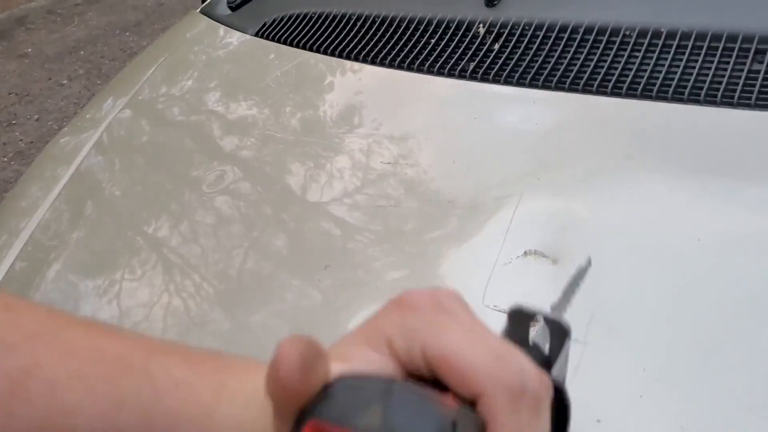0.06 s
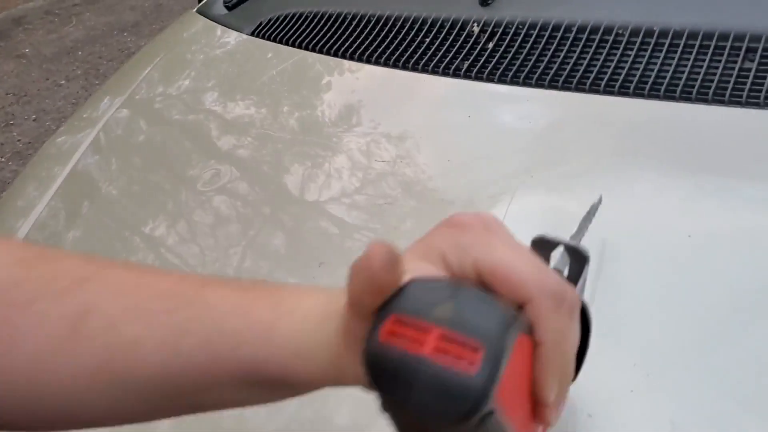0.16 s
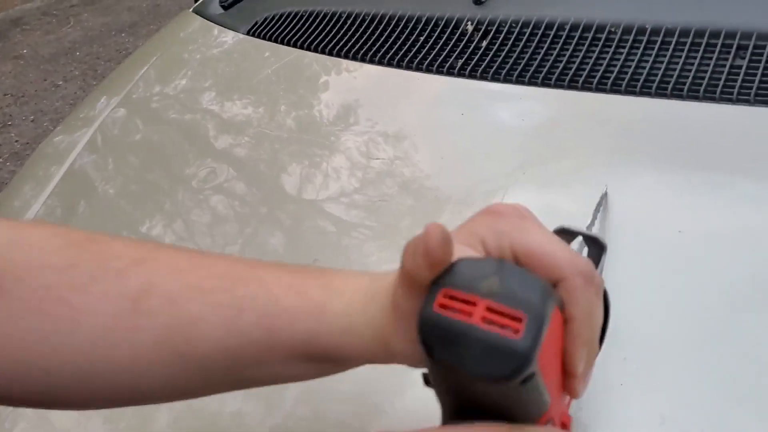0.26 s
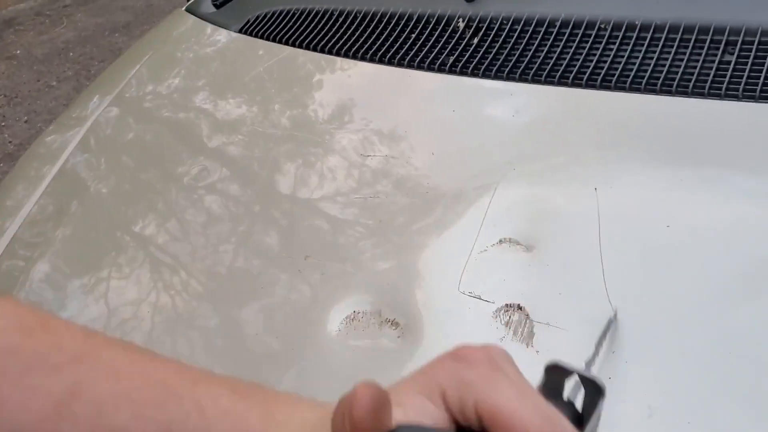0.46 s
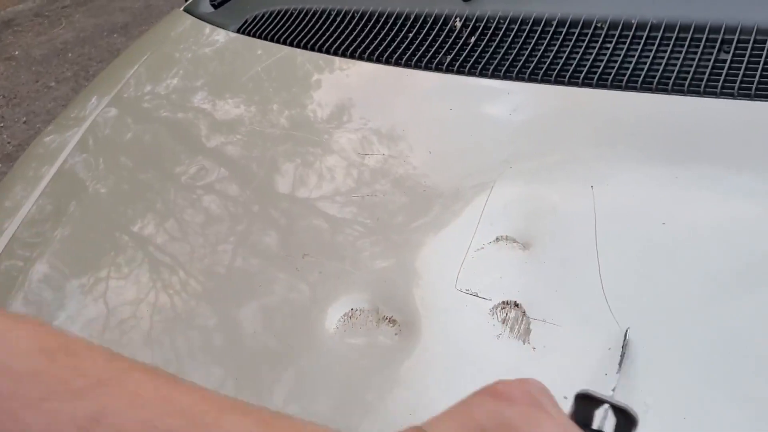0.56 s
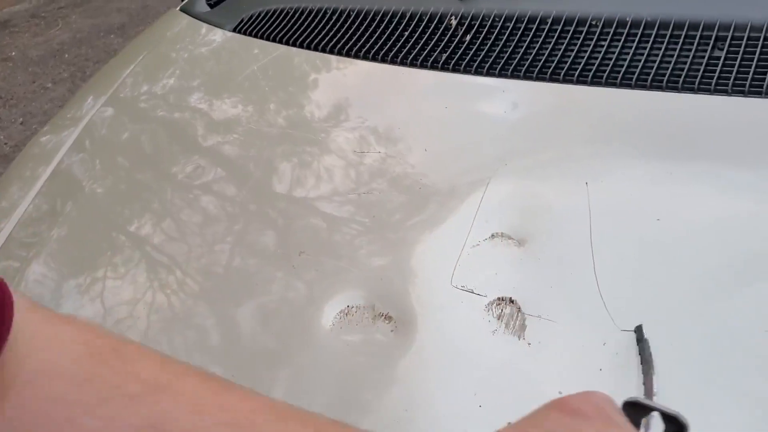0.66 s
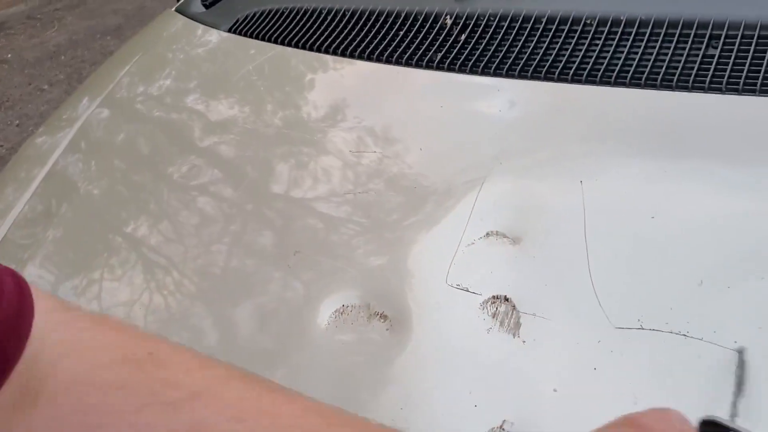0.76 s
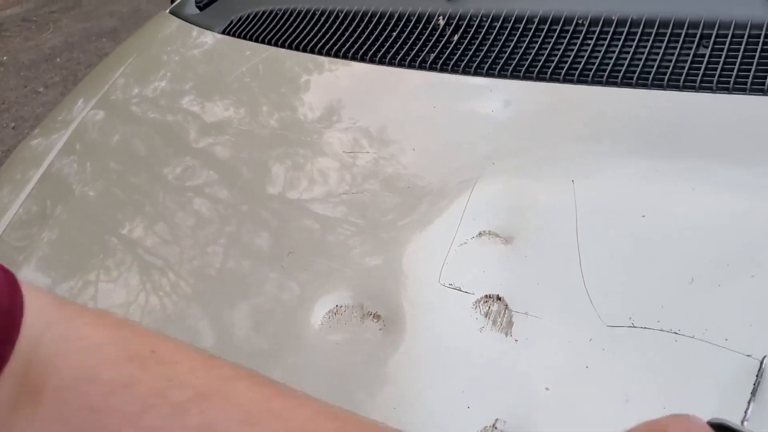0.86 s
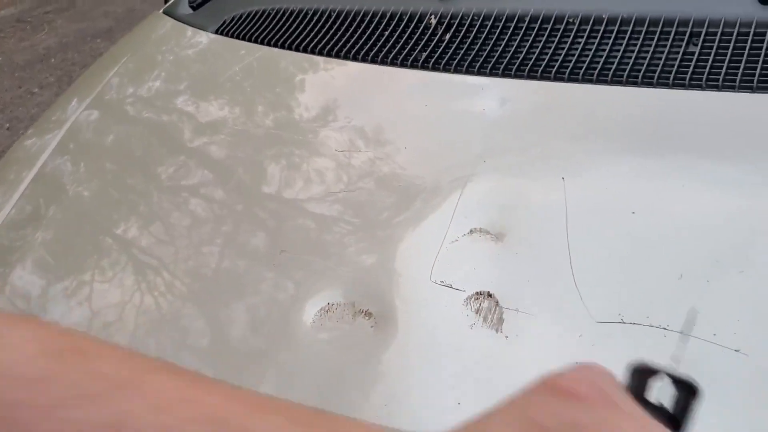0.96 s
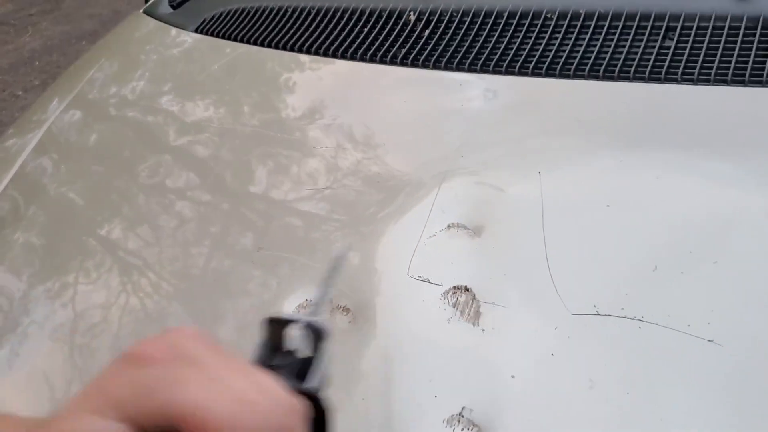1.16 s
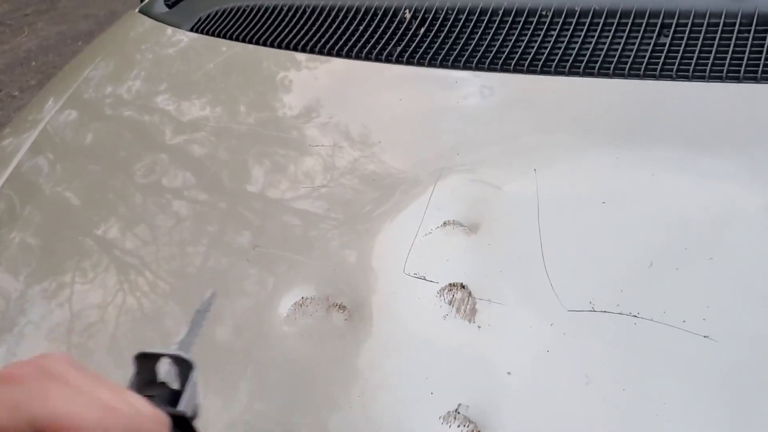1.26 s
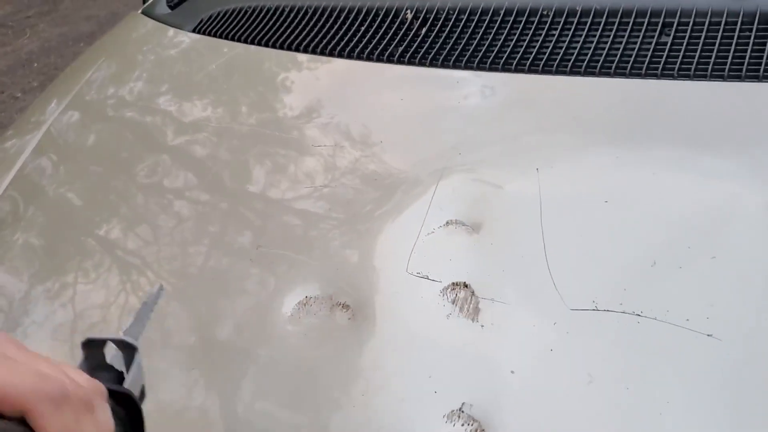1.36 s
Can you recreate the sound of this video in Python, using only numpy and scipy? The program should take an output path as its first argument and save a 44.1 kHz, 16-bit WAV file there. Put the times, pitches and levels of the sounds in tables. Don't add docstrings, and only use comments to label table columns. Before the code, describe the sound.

A saw blade tip scratches painted sheet metal, heard close outdoors. A hollow, boomy clunk lands at 0.22 seconds, then a short dry scrape with a rough chatter at 0.4-0.5. A second knock at 0.62 leads into a louder, gritty, bright rasp until about 0.8, the panel ringing briefly. Small clicks follow at 1.19 and 1.4. A low engine idle, distant traffic and faint bird chirps continue around it.

```python
import sys
import numpy as np
from scipy import signal
from scipy.fft import rfft, irfft
from scipy.io import wavfile

SR = 44100
rng = np.random.default_rng(int(sys.argv[2]) if len(sys.argv) > 2 else 0)


def transcribe(u):
    v = np.clip(np.atleast_2d(u).T, -1, 1)
    q = np.round(v * 32767).astype(np.int16)
    wavfile.write(sys.argv[1], SR, q)


def decibels_to_gain(level_db):
    exponent = np.asarray(level_db, float) / 20
    return 10 ** exponent


N = 61739

# start in seconds, level in dB, fade in seconds, place on the panel (0-2).
LANDINGS = [
    (0.2235, -17.5, 0.0071, 0),
    (0.3896, -38, 0.0017, 1),
    (0.618, -26.5, 0.0052, 0),
    (0.646, -37.5, 0.0035, 2),
]
# time in seconds, speed as tip hiss in dB, pressure as panel drive in dB.
DOWN_STROKE = [(0.261, -69.5, -54), (.305, -50, -38.5), (.35, -55, -49.5), (0.393, -54.5, -57),
               (0.401, -42.5, -24.5), (0.436, -44.5, -27.5), (.487, -62.5, -47.5), (0.518, -63.5, -47.5),
               (0.556, -100, -62)]
SIDE_STROKE = [(0.646, -52, -72), (.652, -28, -24), (0.661, -32, -24.5), (0.669, -32, -30.5),
               (.69, -33, -25.5), (0.721, -32, -27.5), (0.73, -37.5, -32), (0.789, -45.5, -32.5),
               (0.817, -70, -39.5)]
# start in seconds, hiss in dB, panel drive in dB, fade in seconds.
CATCHES = [(0.6327, -34, -46, 0.0042), (0.65, -39, -47, 0.0038), (0.6643, -33, -34, 0.003),
           (.682, -38, -32, 0.0064), (0.7, -31, -24, 0.006), (0.708, -41, -34, 0.0025),
           (0.719, -45, -26, 0.0047), (0.739, -46, -31, .005), (0.75, -42, -46, 0.0022),
           (.434, -61, -40, 0.0015), (0.44, -60, -38, 0.00095)]
# frequency in Hz, T60 in seconds, level in dB at places 0, 1 and 2.
PANEL_MODES = [(303.6, 0.18, 3.5, -21, -11), (345, 0.26, -2.5, -23, -16), (447.3, 0.25, -6, -13.5, -22),
               (843, 0.044, 4, -19, -24), (1006, 0.35, -7, -3.5, -8), (1211, 0.11, -2, -1, -5),
               (1460, 0.066, -23, -17, -21), (1636, 0.069, 10, 11, 9.5), (1730, 0.056, 13.5, 2, 5.5),
               (1816, 0.026, -13, 16, 14), (2133, 0.025, -19, 13, -16), (2640, 0.075, -17, 3, 0)]
# frequency in Hz, level in dB.
WEAK_MODES = [(200, -23), (500, -15.5), (1200, -9.5), (2000, -10.5), (3200, -17), (5000, -26.5),
              (7500, -13), (10000, -34.5)]
# frequency in Hz, density in dB per Hz.
TEARING = [(2500, 16.5), (4500, 6), (6200, 2), (8300, -3), (9900, -9.5), (11500, -0.5), (13200, -1.5),
           (15400, -0.5)]
# time in seconds, slips per second, level in dB.
CHATTER = [(.4, 1630, -66), (.412, 1280, -41), (.43, 970, -29), (.452, 1070, -39), (.47, 940, -39),
           (.52, 900, -90), (.66, 1000, -100), (.695, 1250, -38), (.72, 1220, -33), (.76, 1300, -40),
           (.83, 760, -100)]
# start in seconds, push in dB, signed size, length in seconds.
FLEXES = [
    (0.236, -22.5, -0.47, 0.0097),
    (0.619, -25.5, 0.42, 0.005),
    (0.647, -17.5, -0.2, 0.0048),
    (.663, -18.5, -0.53, 0.0056),
]
# frequency in Hz, level in dB, T60 in seconds.
BOOM_MODES = [(65.53, 7, 0.64), (83, 13, 0.061), (99.3, 10.5, 0.24), (139, 2.5, 0.59)]
# start in seconds, level in dB, frequency in Hz,
# T60 in seconds, hiss in dB.
KNOCKS = [(0.2012, -36.5, 1570, 0.039, -61), (0.2241, -5, 277, 0.032, -49), (.235, -30, 456, 0.47, -80),
          (0.2253, -21, 1694, 0.091, -54), (.232, -20.5, 830, 0.085, -80), (.232, -28.5, 309, 0.43, -80),
          (0.3984, -21.5, 1627, 0.046, -66), (.563, -60, 2950, 0.02, -46), (0.608, -54, 3000, 0.016, -45),
          (0.6206, -23.5, 1822, 0.045, -29.5), (0.616, -19.5, 127.2, 0.11, -78),
          (.626, -19.5, 345, 0.16, -76.5), (.772, -25, 318.2, 0.44, -74),
          (1.1859, -19.5, 2317, 0.012, -34.5), (1.1862, -41, 3100, 0.012, -70),
          (1.191, -31.5, 2160, 0.018, -63), (0.225, -18.5, 1320, 0.045, -70), (.62, -25, 530, 0.065, -80),
          (.651, -14.5, 140.6, 0.11, -80), (1.396, -29.5, 1780, 0.021, -49.5)]
# frequency in Hz, level in dB, T60 in seconds.
LEFTOVER_MODES = [(95, -23.5, 0.021), (263.7, -40.5, 0.46), (317, -39, 0.29)]
# frequency in Hz, level in dB, T60 in seconds.
EXHAUST_MODES = [(75, -17, 0.27), (114.2, -2, 0.36), (131.4, -0.5, 0.16), (182.5, -3.5, 0.19),
                 (267, -36, 0.28), (402, -19, 0.18)]
# frequency in Hz, density in dB per Hz.
RUMBLE = [(25, -30), (40, -6), (100, 8.5), (200, -11.5), (300, -24.5), (500, -24)]
TRAFFIC = [(400, -2), (600, -12.5), (980, -4.5), (1400, -10), (2000, -7.5), (3000, -23), (5000, -33),
           (16000, -49.5)]
# time in seconds, level in dB.
TRAFFIC_SWELL = [(0, -6), (.2, -0.5), (.9, -0.5), (1.4, 0)]
# frequency in Hz, left-right likeness (-1 to 1).
LIKENESS = [(60, 0.83), (150, 0.99), (350, 0.64), (520, 0.41), (700, 1), (1100, -0.28), (2000, -0.072)]
# time in seconds, pitch in Hz, level in dB.
FIRST_BIRD = [(.06, 4640, -90), (.075, 4640, -72), (.095, 4650, -65), (.12, 4650, -59), (.135, 4790, -61),
              (.155, 4870, -66), (.175, 4910, -75), (.2, 4960, -68), (.23, 5000, -90)]
SECOND_BIRD = [(.76, 3300, -77), (.778, 3330, -45), (.81, 3170, -52), (.83, 3200, -57), (.855, 3130, -53),
               (.89, 3060, -53), (.916, 3170, -58), (.93, 3900, -64), (.955, 4500, -75)]

LEFT_DB = -1.15
GRAINS_PER_S, GRAIN_SPREAD_DB, JUDDER_DB = 4500, 2, 1
LANDING_HISS_DB, CATCH_DULL_DB = -19.5, -2
KNOCK_HISS_SHARE, KNOCK_HISS_MAX_S = .1, .0035
WEAK_T60_S, WEAK_T60_SLOPE = 0.28, 0.81
SPLIT_HZ = 620
HISS_SHARED, BRIGHT_HZ, BRIGHT_DB = 0.4, 10500, -2.5
TIP_HZ, TIP_WIDTH_HZ, TIP_GAIN = 12900, 300, .8
CHATTER_WOBBLE_HZ, CHATTER_OCTAVE_DB = 45.06, -11.5
BOOM_LEAN_DB, BOOM_LAG_S = -0.5, .0005
SPREAD_CYCLES, RISE_CYCLES = 12.2, 0.45
FIRING_S, FIRST_FIRING_S, SPEEDING_S = .0277, -.005, 2.9e-6
WEAK_CYLINDER_DB, FIRING_SPREAD_DB, ENGINE_DB = -13.5, 3, -35.5
RUMBLE_DB, TRAFFIC_DB = -37, -49
TRILL_HZ, TRILL_PER_S = 105, 38
ECHO_T60_S, ECHO_SHARE = .4, .7


def in_time(rows, quiet=None):
    s, *columns = np.transpose(rows)
    return [np.interp(np.arange(N) / SR, s, c, quiet, quiet) for c in columns]


def at_hz(points, hz):
    table_hz, value = np.transpose(points)
    return np.interp(np.log(hz), np.log(table_hz), value)


def rms_one(x):
    return x / np.sqrt(np.mean(x ** 2) + 1e-20)


def drift(rate_hz):
    r = np.exp(-2 * np.pi * rate_hz / SR)
    noise = rng.standard_normal(N + SR)
    return rms_one(signal.lfilter([1], [1, -2 * r, r * r], noise)[SR:])


def filtered(x, order, hz, kind):
    return signal.sosfilt(signal.butter(order, hz, kind, fs=SR, output="sos"), x)


def ringing(hz, t60, gain):
    t = np.arange(SR // 2) / SR
    hz, t60 = np.asarray(hz)[:, None], np.asarray(t60)[:, None]
    return gain @ (np.sin(2 * np.pi * hz * t) * decibels_to_gain(-60 * t / t60))


def through(x, response):
    return signal.fftconvolve(np.atleast_2d(x), np.atleast_2d(response), axes=1)[:, :N]


def burst(s, length_s):
    t = np.maximum(np.arange(N) / SR - s, 0)
    return (1 - np.exp(-t / 0.00077)) * np.exp(-t / length_s)


def grains():
    sizes = decibels_to_gain(GRAIN_SPREAD_DB * np.minimum(rng.exponential(1, N), 5))
    signs = rng.choice([-1, 1], N)
    return rms_one(sizes * signs * (rng.random(N) < GRAINS_PER_S / SR))


def contact():
    drive, speed, snap = np.zeros((3, N)), np.zeros(N), np.zeros(N)
    judder = decibels_to_gain(JUDDER_DB * drift(79))
    for place, stroke in ((1, DOWN_STROKE), (2, SIDE_STROKE)):
        hiss_db, press_db = in_time(stroke, quiet=-200)
        speed += decibels_to_gain(hiss_db) * judder
        drive[place] += decibels_to_gain(press_db) * judder
    for s, db, length_s, place in LANDINGS:
        shape = burst(s, length_s)
        drive[int(place)] += decibels_to_gain(db + 10) * shape
        speed += decibels_to_gain(db + LANDING_HISS_DB) * shape
    for s, _, _, t60, hiss_db in KNOCKS:
        speed += decibels_to_gain(hiss_db) * burst(s, min(KNOCK_HISS_SHARE * t60, KNOCK_HISS_MAX_S))
    for s, hiss_db, press_db, length_s in CATCHES:
        shape = burst(s, length_s)
        place = 1 + int(s > SIDE_STROKE[0][0])
        speed += decibels_to_gain(hiss_db + CATCH_DULL_DB) * shape
        snap += decibels_to_gain(hiss_db) * shape
        drive[place] += decibels_to_gain(press_db) * shape
    return drive, speed, snap


def panel_at(place):
    weak_hz = np.geomspace(200, 10000, num=200) * rng.uniform(.99, 1.01, 200)
    weak_t60 = WEAK_T60_S * (1000 / weak_hz) ** WEAK_T60_SLOPE
    table = np.array(PANEL_MODES)
    hz = np.r_[table[:, 0], weak_hz]
    t60 = np.r_[table[:, 1], weak_t60]
    level = decibels_to_gain(np.r_[table[:, 2 + place], at_hz(WEAK_MODES, weak_hz)])
    turn = rng.choice([-1, 1], len(hz)) * rng.uniform(0.36, 0.76, len(hz)) * np.pi / 2
    turn = turn * hz ** 2 / (hz ** 2 + SPLIT_HZ ** 2)
    ears = np.cos(turn + np.pi / 4 * np.array([[-1], [1]])) * rng.choice([-1, 1], len(hz))
    response = ringing(hz, t60, level * ears)
    return response / np.sqrt(np.sum(response ** 2) / 2)


def tearing_hiss(speed, snap):
    shared = grains()
    flakes = HISS_SHARED * np.array([np.roll(shared, 5), shared]) + 1.03 * np.array([grains(), grains()])
    hz = np.fft.rfftfreq(2 * SR, 1 / SR) + 1
    colour = decibels_to_gain(at_hz(TEARING, hz)) * hz ** 2 / (hz ** 2 + TEARING[0][0] ** 2)
    colour = colour / (1 + (hz / 15700) ** 120)
    colour = colour * (1 + TIP_GAIN / (1 + ((hz - TIP_HZ) / TIP_WIDTH_HZ) ** 2))
    colour = 1.41 * colour / np.sqrt(np.mean(colour ** 2))
    hiss = irfft(rfft(flakes * speed, 2 * SR) * colour)[:, :N]
    top = filtered(hiss, 4, BRIGHT_HZ, "high")
    return hiss + top * (decibels_to_gain(BRIGHT_DB) + snap / speed - 1)


def blade():
    drive, speed, snap = contact()
    force = grains()
    rings = sum(through(force * drive[place], panel_at(place)) for place in range(3))
    return rings + tearing_hiss(speed, snap)


def chatter():
    slip_hz, db = in_time(CHATTER, quiet=-200)
    turn = 2 * np.pi * np.cumsum(slip_hz + CHATTER_WOBBLE_HZ * drift(88.7)) / SR
    common = drift(49)
    ears = []
    for lag in (0, 1.2):
        tone = np.sin(turn + lag) + decibels_to_gain(CHATTER_OCTAVE_DB) * np.sin(2 * turn - lag)
        ears.append((1.56 + .5 * common + .5 * drift(72)) * tone)
    return decibels_to_gain(db) * np.array(ears)


def knocks():
    out, t = np.zeros((2, N + SR)), np.arange(SR // 2) / SR
    for s, db, hz, t60, _ in KNOCKS:
        spread = min((SPREAD_CYCLES / (hz * t60)) ** 1.51, .4)
        cluster = 1 + spread * np.array([-0.91, 0.077, 0.113, 0.68])
        gain = decibels_to_gain(db - 10 + rng.normal(0, 1.5, (2, len(cluster))))
        click = ringing(hz * cluster, np.full(len(cluster), t60), gain)
        start = int(s * SR)
        out[:, start:start + SR // 2] += click * (1 - np.exp(-t * hz / RISE_CYCLES))
    return out[:, :N]


def boom():
    t, push = np.arange(N) / SR, np.zeros(N)
    for s, db, sign, length_s in FLEXES:
        half_sine = np.sin(np.pi * np.clip((t - s) / length_s, 0, 1))
        push += sign * decibels_to_gain(db) * half_sine * 2 / (length_s * SR)
    push = filtered(push, 4, 54, "high")
    hz, db, t60 = np.transpose(BOOM_MODES)
    lean = np.array([[0.85, -0.77, 1, -1.2], [-0.9, 0.8, -0.61, 0.41]])
    response = ringing(hz, t60, decibels_to_gain(db + BOOM_LEAN_DB * lean))
    return through([push, np.roll(push, int(BOOM_LAG_S * SR))], response)


def leftover():
    t = np.arange(N) / SR
    return sum(-decibels_to_gain(db - 60 * t / t60) * np.cos(2 * np.pi * hz * t) for hz, db, t60 in LEFTOVER_MODES)


def engine():
    k = np.arange(-8, 52)
    lead = SR // 4
    firing_s = FIRST_FIRING_S + k * FIRING_S - SPEEDING_S * k ** 2
    clicks = np.zeros(N + SR)
    firing_db = WEAK_CYLINDER_DB * (k % 2) + FIRING_SPREAD_DB * rng.standard_normal(len(k))
    clicks[(firing_s * SR).astype(int) + lead] = decibels_to_gain(firing_db)
    hz, db, t60 = np.transpose(EXHAUST_MODES)
    beats = signal.fftconvolve(clicks, ringing(hz, t60, decibels_to_gain(db)))[lead:lead + N]
    return decibels_to_gain(ENGINE_DB) * rms_one(filtered(beats, 2, 330, "low"))


def bird(call, trill_hz):
    hz, db = in_time(call)
    trill = trill_hz * np.sin(2 * np.pi * TRILL_PER_S * np.arange(N) / SR)
    hz = hz + trill + (15 + trill_hz * .3) * drift(150)
    level = (db > db[-1]) * decibels_to_gain(db + 2.5 * drift(50))
    tone = level * np.sin(2 * np.pi * np.cumsum(hz) / SR)
    tail = rng.standard_normal((2, SR // 2)) * decibels_to_gain(-60 * np.arange(SR // 2) / SR / ECHO_T60_S)
    echo = through(tone, tail / np.sqrt(np.sum(tail ** 2) / 2))
    return np.array([tone, 1.3 * np.roll(tone, 9)]) + ECHO_SHARE * echo


def far_noise(spectrum, low_hz, high_hz, patchy_db):
    pair = rng.standard_normal((2, N))
    out, edges = 0, 25 * 2 ** np.arange(0, 9.6, .5)
    for k, (low, high) in enumerate(zip(edges, edges[1:])):
        hz = np.sqrt(low * high)
        if low_hz < hz < high_hz:
            mid, side = filtered(np.roll(pair, k * SR // 20, axis=1), 2, [low, high], "band")
            alike = np.clip(at_hz(LIKENESS, hz), -1, 1)
            gain = decibels_to_gain(at_hz(spectrum, hz) + patchy_db * drift(11.4))
            out = out + gain * (np.sqrt(1 + alike) * mid + np.sqrt(1 - alike) * side * [[1], [-1]])
    return rms_one(out)


def rumble():
    return decibels_to_gain(RUMBLE_DB) * far_noise(RUMBLE, 20, 420, patchy_db=3.0)


def traffic():
    swell_db, = in_time(TRAFFIC_SWELL)
    return decibels_to_gain(TRAFFIC_DB + swell_db) * far_noise(TRAFFIC, 420, 20000, patchy_db=2.5)


def scene():
    near = (blade() + knocks() + chatter()) * decibels_to_gain([[LEFT_DB], [-LEFT_DB]])
    near = near + boom() + leftover()
    birds = bird(FIRST_BIRD, trill_hz=0) + bird(SECOND_BIRD, trill_hz=TRILL_HZ)
    return near + engine() + birds + rumble() + traffic()


def roll_off(x):
    return signal.sosfilt(signal.butter(12, 15900, fs=SR, output="sos"), x)


def record(dry):
    mix = filtered(dry, 2, 30, "high")
    return roll_off(mix)


dry = scene()
out = record(dry)
transcribe(out)
```